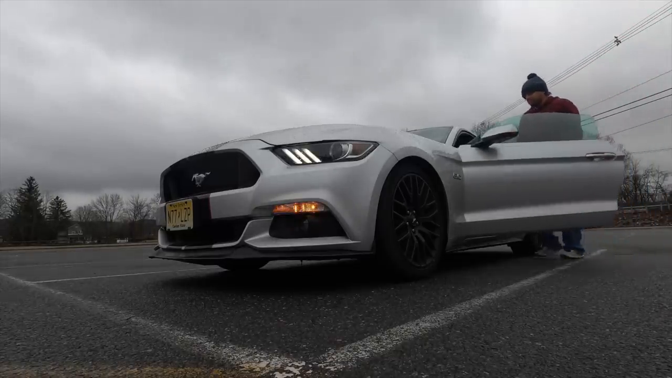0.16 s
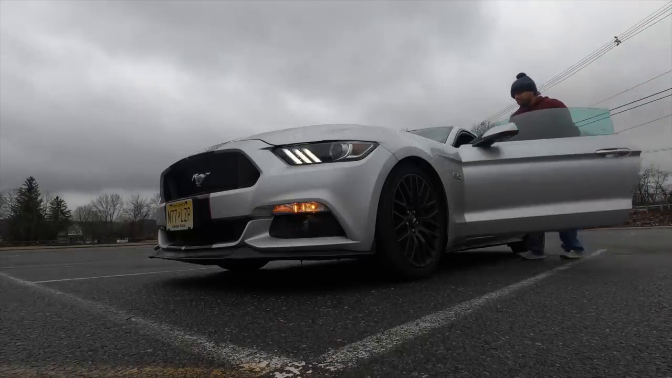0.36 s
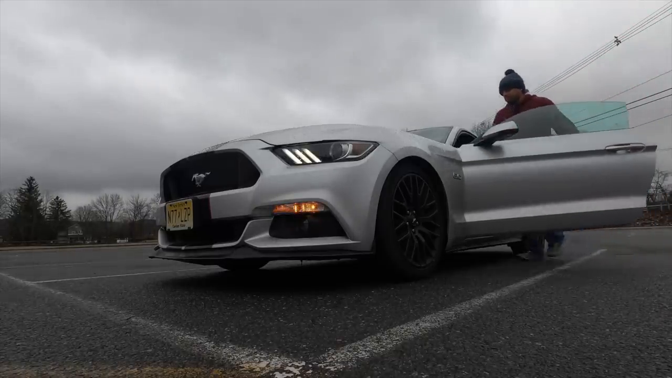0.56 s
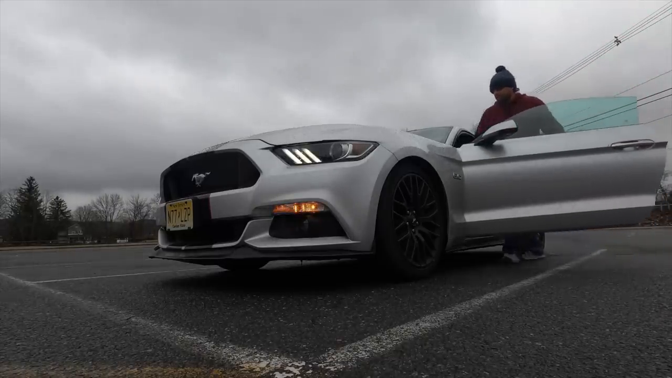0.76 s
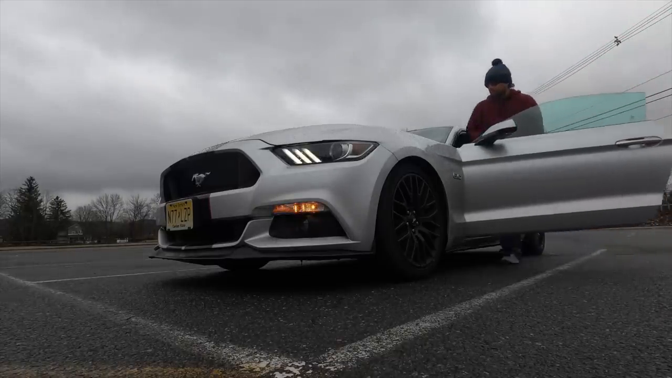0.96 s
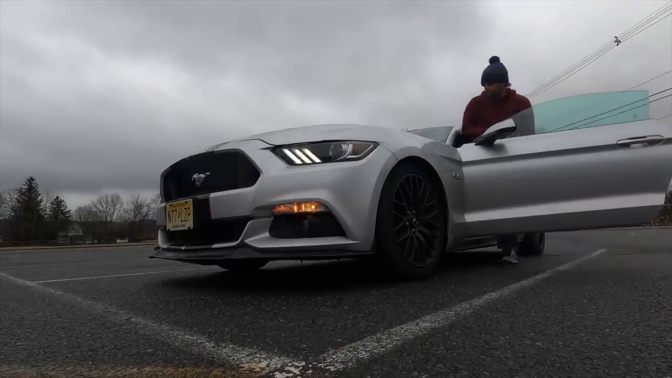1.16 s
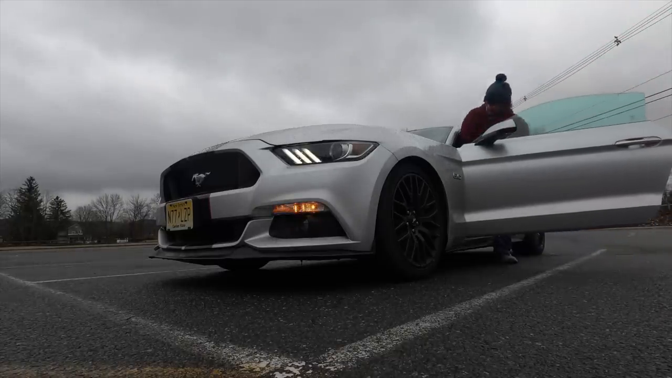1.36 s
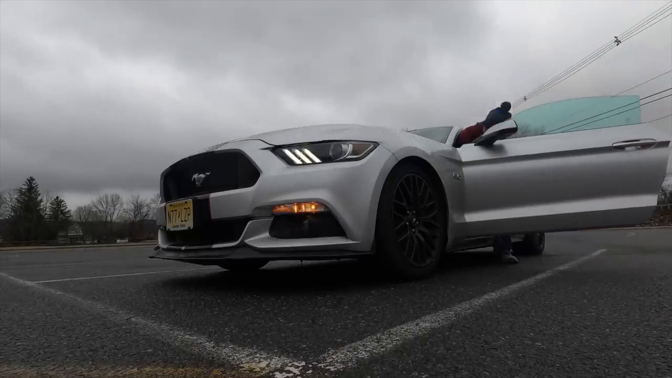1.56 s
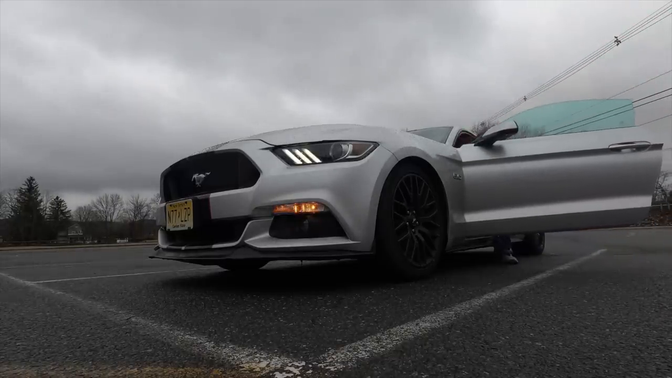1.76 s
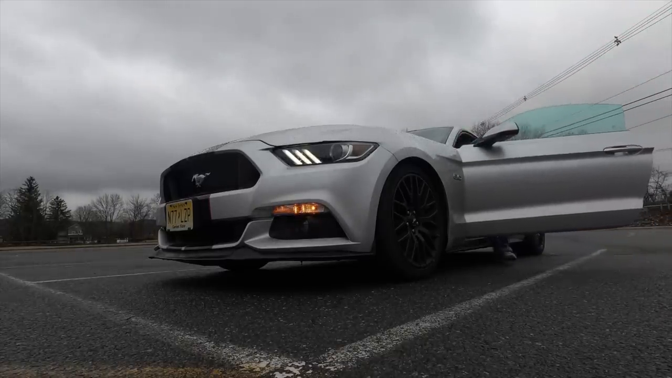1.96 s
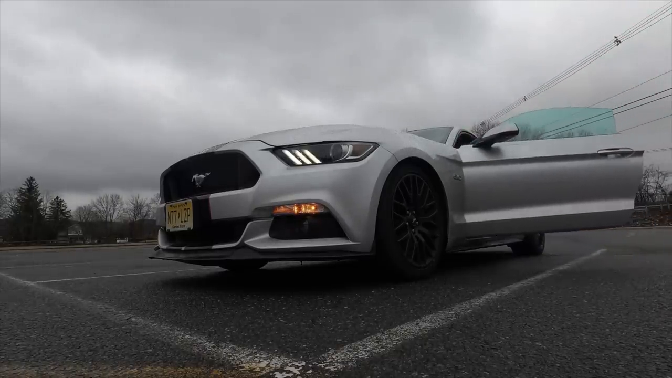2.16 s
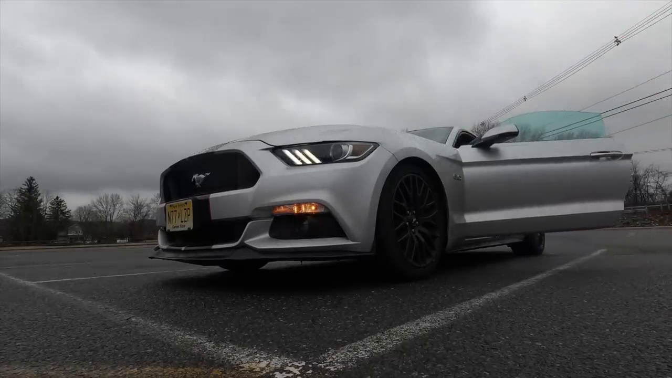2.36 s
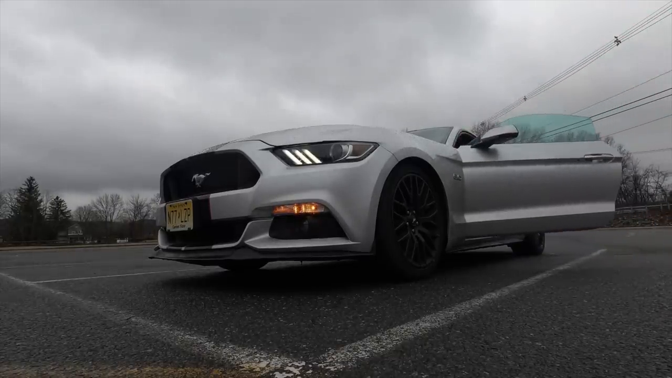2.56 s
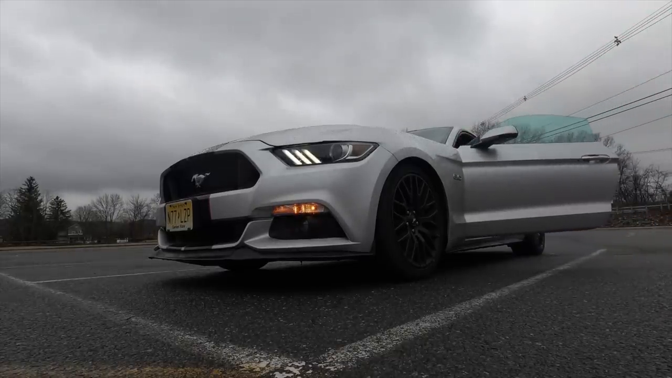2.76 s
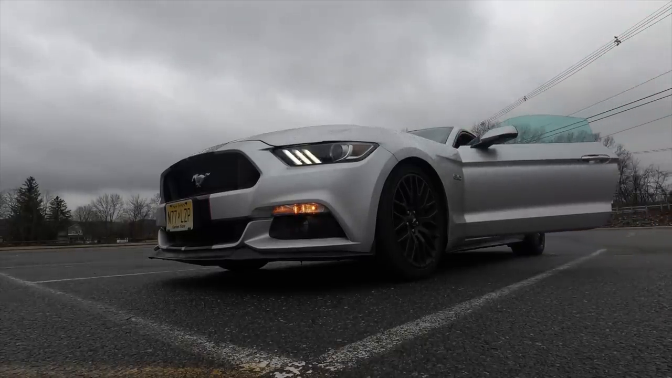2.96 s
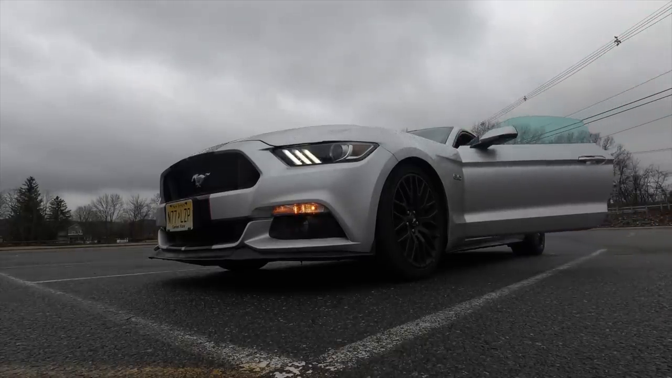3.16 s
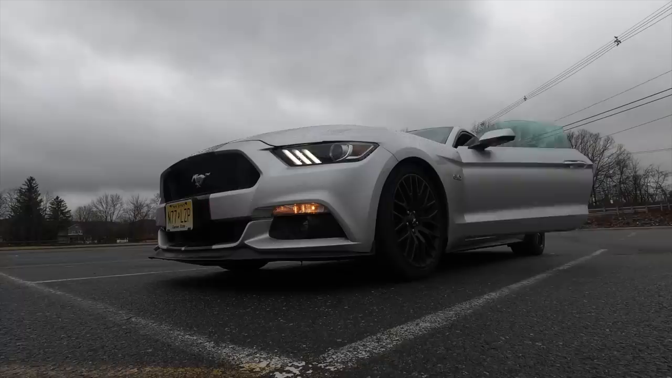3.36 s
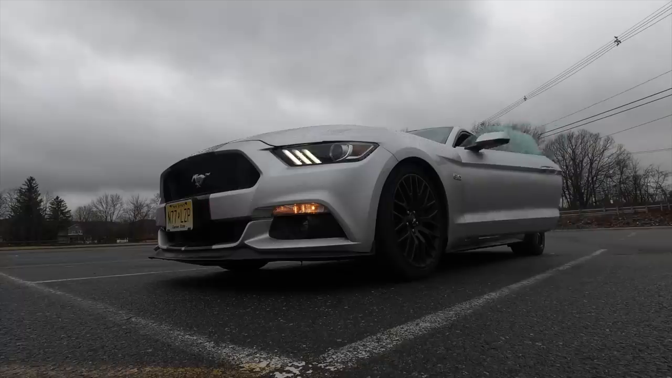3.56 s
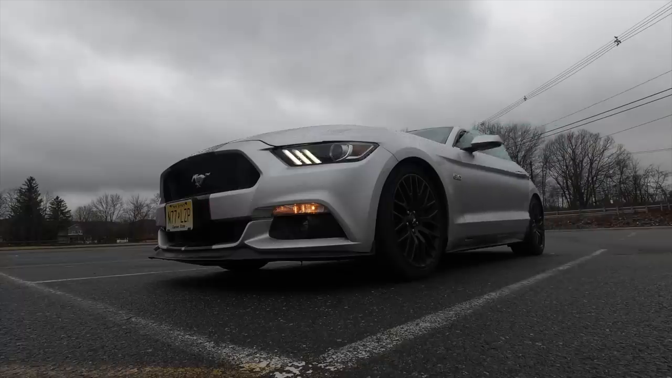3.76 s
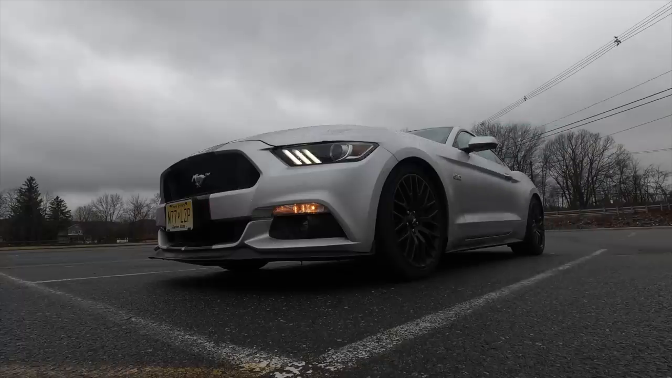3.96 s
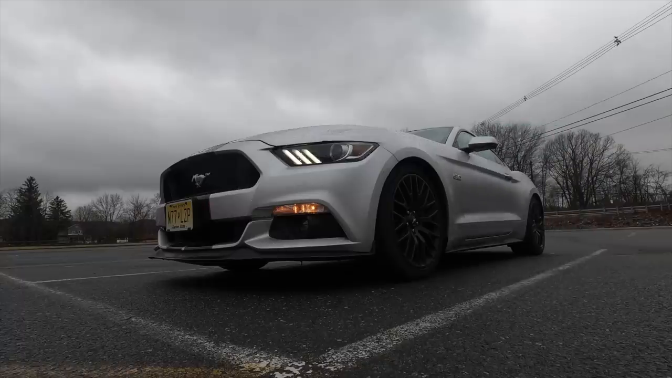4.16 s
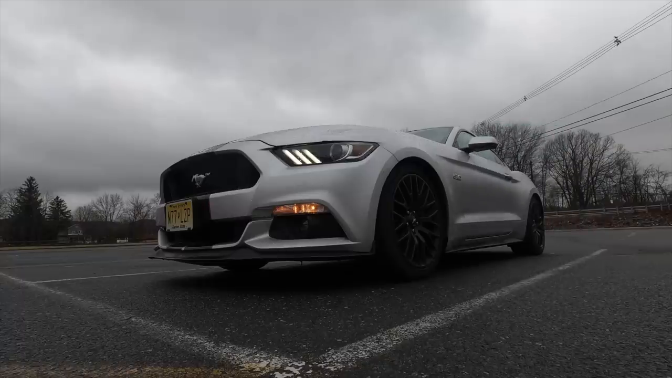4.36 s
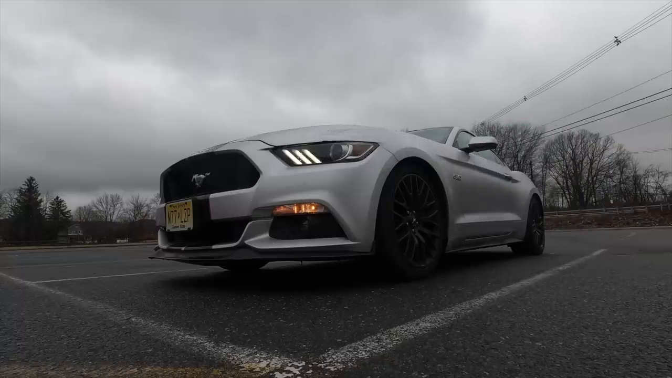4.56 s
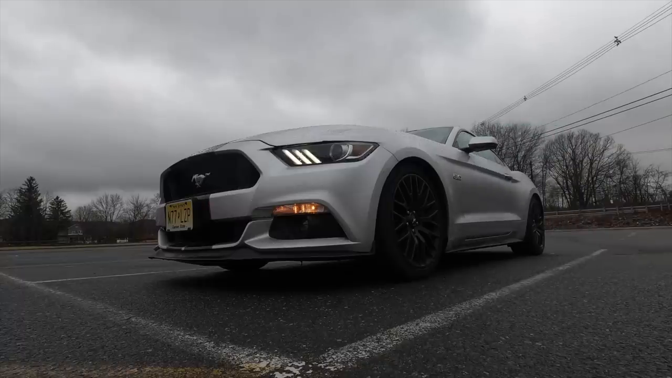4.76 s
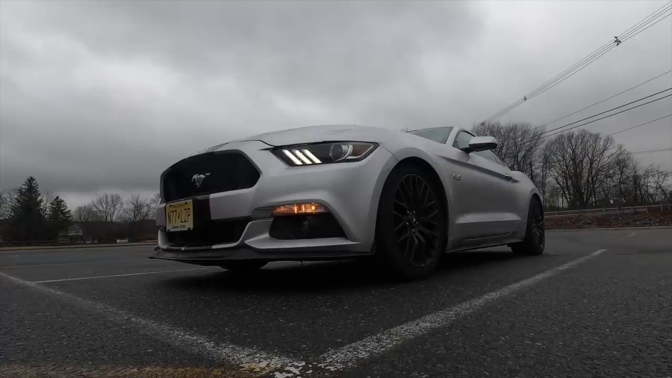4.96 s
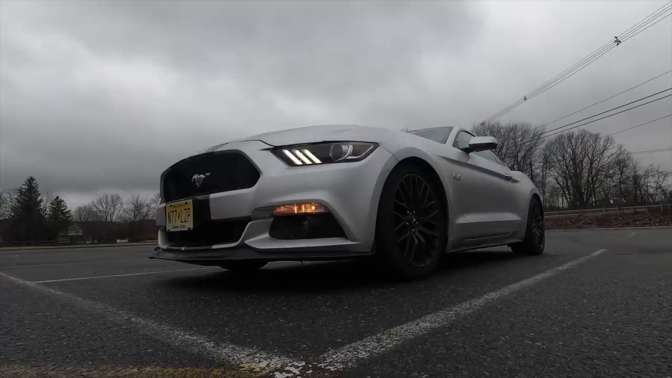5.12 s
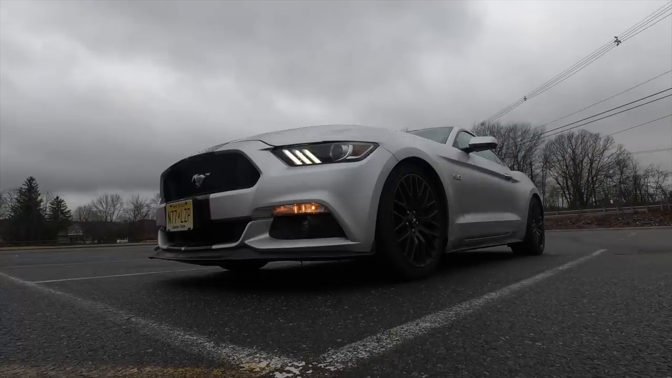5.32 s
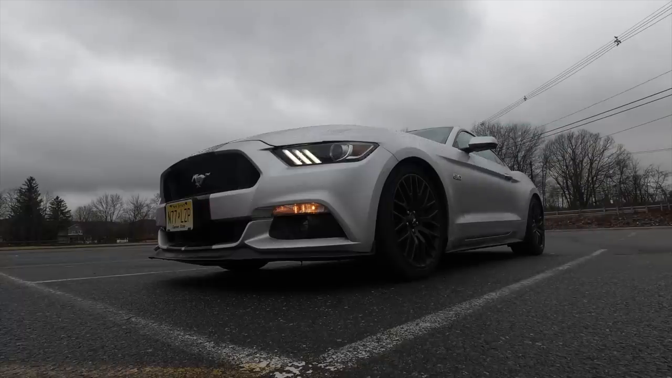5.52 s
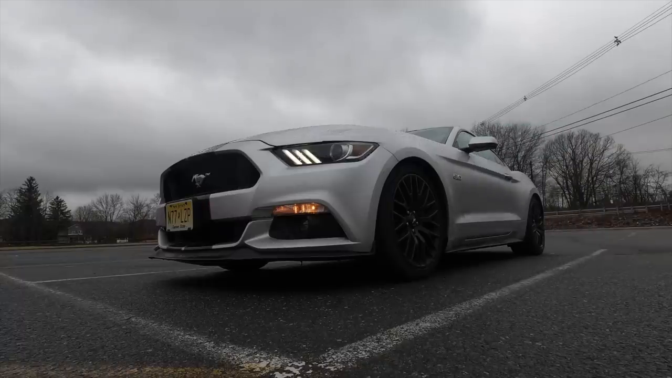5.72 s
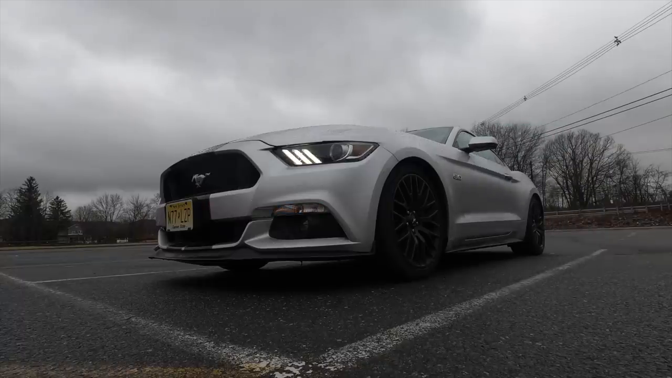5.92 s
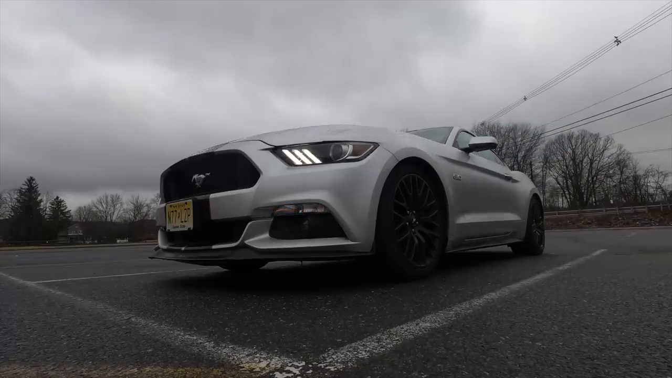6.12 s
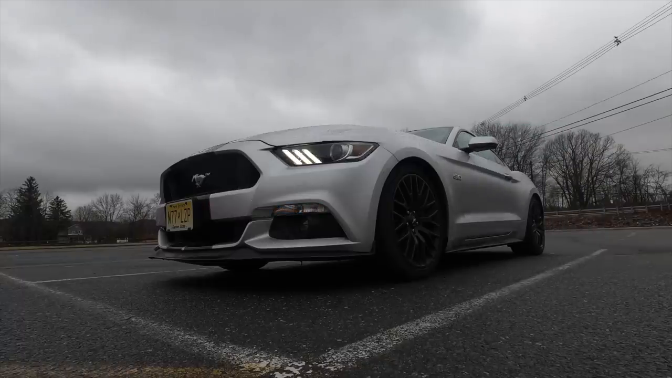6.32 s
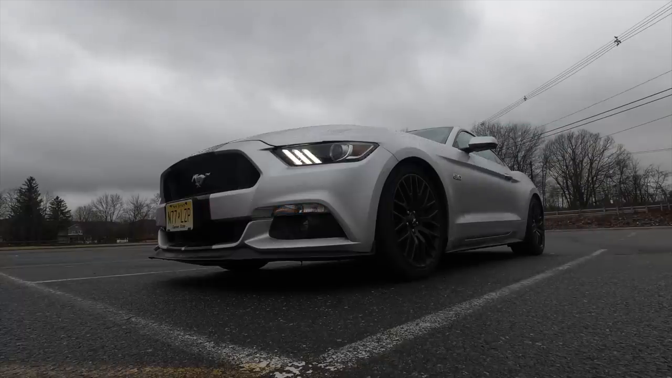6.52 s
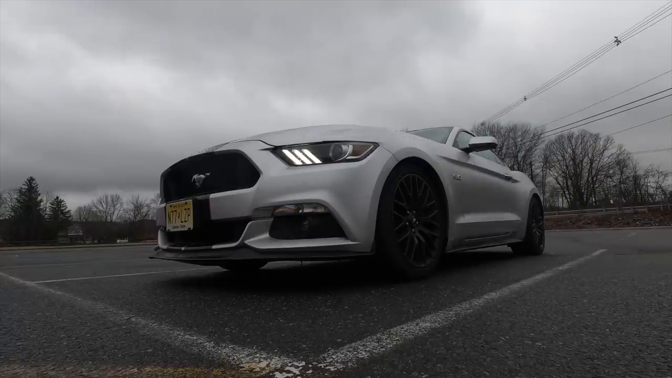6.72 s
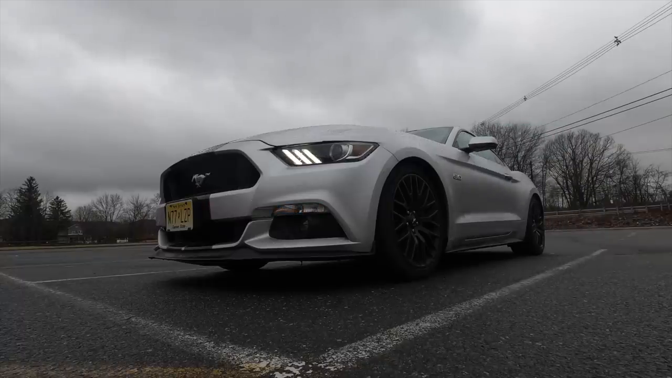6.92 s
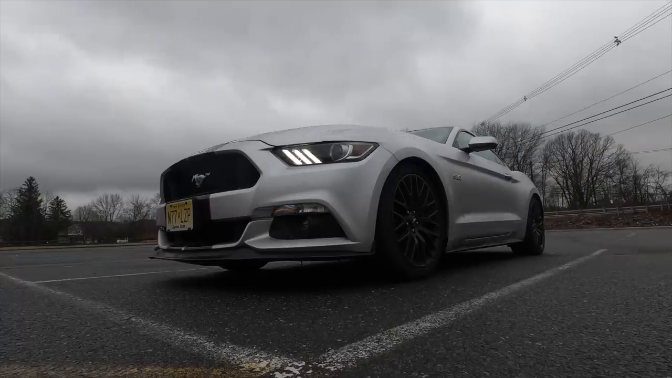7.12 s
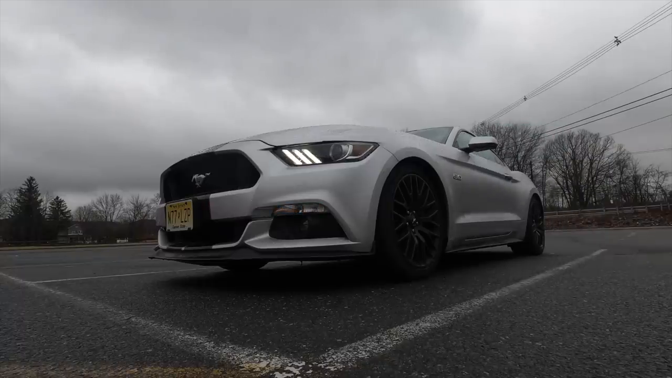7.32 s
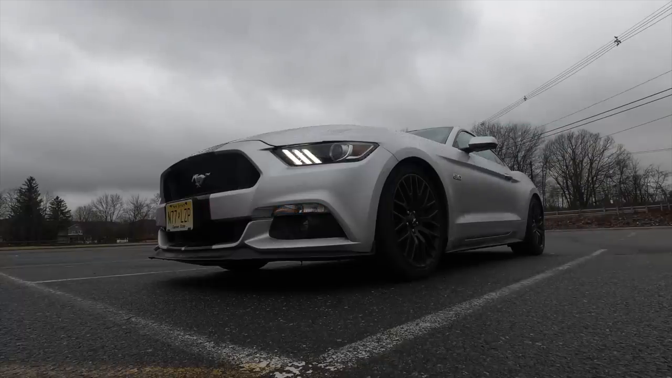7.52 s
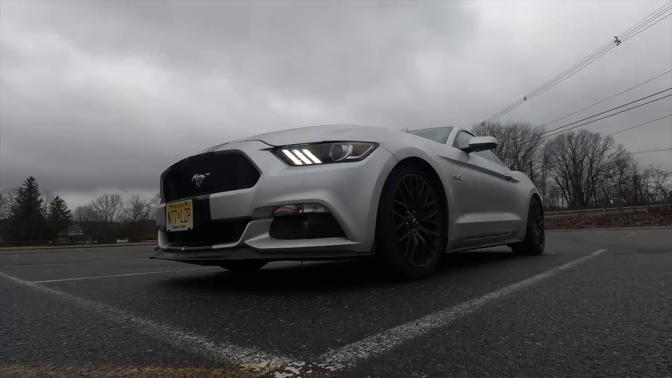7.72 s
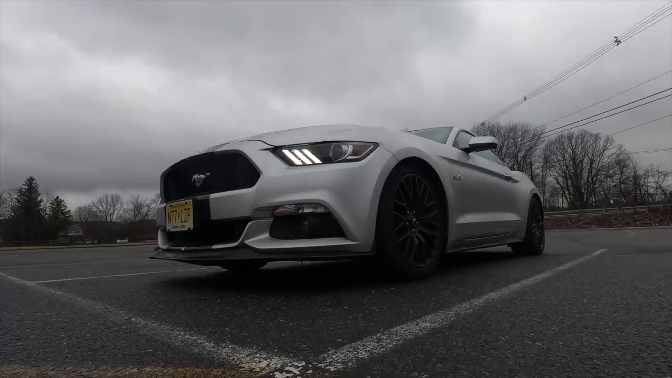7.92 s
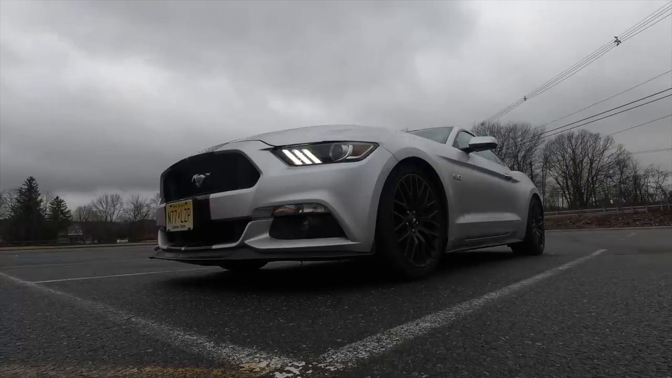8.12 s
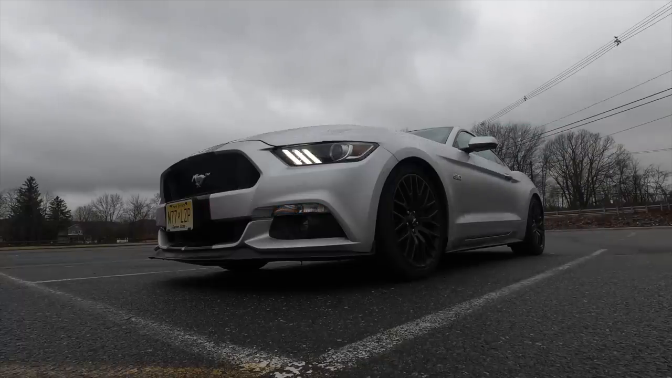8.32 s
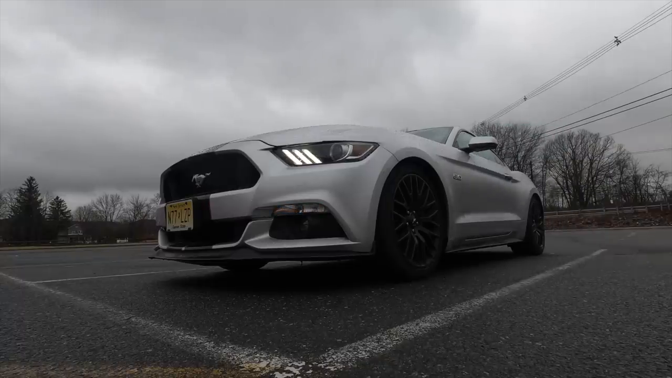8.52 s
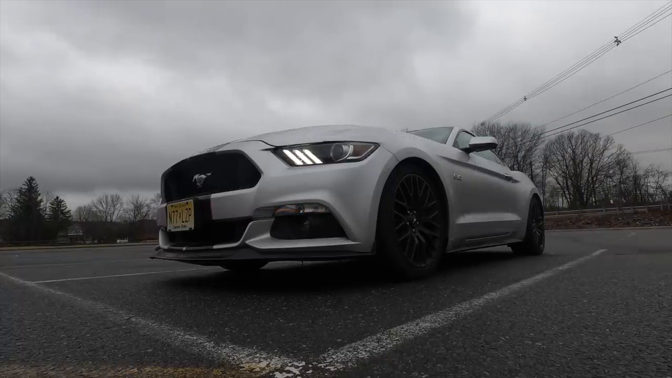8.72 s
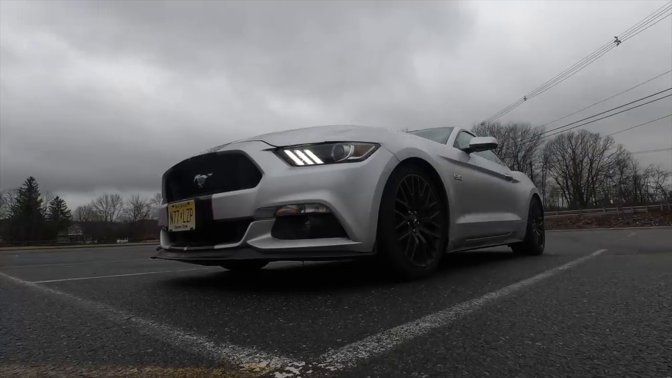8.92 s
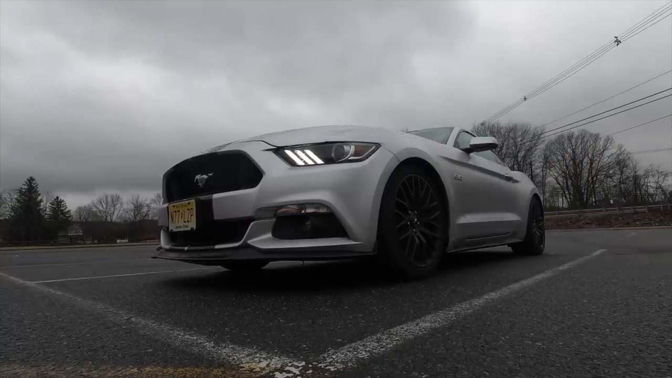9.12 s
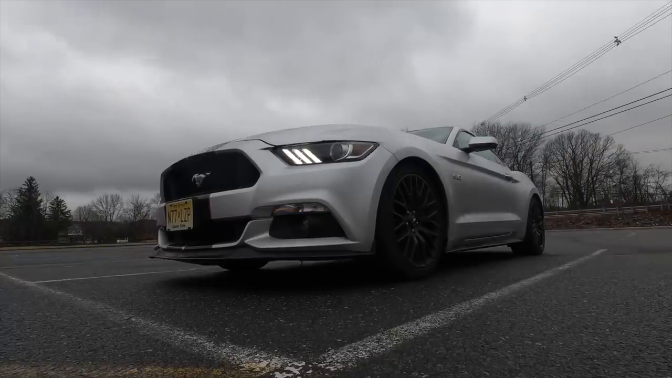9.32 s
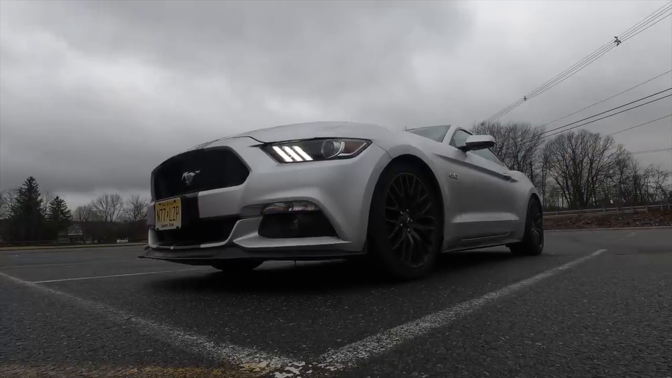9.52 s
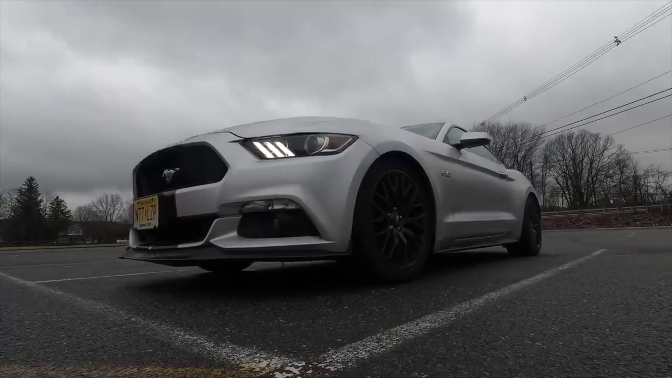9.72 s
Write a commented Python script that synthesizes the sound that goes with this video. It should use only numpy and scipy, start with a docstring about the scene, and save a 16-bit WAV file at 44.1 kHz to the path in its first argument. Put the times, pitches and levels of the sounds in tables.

```python
"""A door slams, a starter whines, and a V8 coupe catches, flares and settles to a fast, booming idle.
It is heard low by the front wheel in an open parking lot, over far traffic. The driver scuffs in; the
slam cracks the latch and rings the panels. The solenoid clacks, gear teeth whine and rattle through five
compression strokes, then firings pulse the exhaust and the idle swells twice. The recorder's gain
control ducks the background after the slam and holds the engine level."""
import sys
import numpy as np
from scipy import signal
from scipy.fft import rfft, irfft
from scipy.io import wavfile
from scipy.ndimage import uniform_filter1d

SR = 44100
rng = np.random.default_rng(int(sys.argv[2]) if len(sys.argv) > 2 else 0)


def transcribe(u):
    """Save the signal u as a 16-bit wav file named by the first command-line argument.

    u: samples, shape (n,) or (channels, n), limited to [-1, 1]; the rate is SR.
    q: integer samples, one column per channel.
    """
    v = np.clip(np.atleast_2d(u).T, -1, 1)
    q = np.round(v * 32767).astype(np.int16)
    wavfile.write(sys.argv[1], SR, q)


N = 435708
T = np.arange(N) / SR
HZ = np.fft.rfftfreq(N, 1 / SR)

# Hiss of throttle air and starter brushes. Each row: frequency in Hz, relative level in dB.
HISS_COLOUR = [(1500, -10), (3500, 12.5), (4900, -5.5), (6500, -3), (9000, -11.5), (12500, -22.5),
               (15000, -34)]

CATCH_S, STEADY_S, FIRING_EDGE_S = 6.822, 7.0, 0.0092  # from STEADY_S the firings run together
ENGAGE_S, OVERRUN_S, RELEASE_S = 5.975, 6.77, 6.95  # from OVERRUN_S the engine drives the starter gear
FIRST_TEETH_HZ, LAST_TEETH_HZ = 256.1, 430.2


def engine_state(idle_hz=89.4, pull_span_hz=8.8, flare_hz=26.17, build_s=0.46):
    """Firing rate sets how hard the engine pulls (0 to 1), and that sets each layer's level."""
    # Engine speed. Each row: time in seconds, firing rate in Hz.
    speed = [(7.0, 84), (7.1, 88.6), (7.22, 95.5), (7.5, 97.4), (7.75, 96.4), (8.0, 90), (8.25, 87.9),
             (9.03, 88.7), (9.28, 98.6), (9.42, 95.5), (9.6, 94.3), (9.87, 79)]
    firing_hz = curves(speed)[0] + flare_hz * swell(6.925, 0.03)
    pull = np.clip((firing_hz - idle_hz) / pull_span_hz, 0, 1)
    built = running(CATCH_S, build_s)
    weak_db = 10.5 * (1 - built)  # the exhaust gains as the firings grow regular
    pickup_db = 3.5 * np.sin(np.pi * built)  # extra load while first gaining speed
    boom_db = -6 - 2 * pull - 0.58 * weak_db
    load_db = -25 + 6.5 * pull + pickup_db - weak_db
    clatter_db = -33.5 + 2.5 * pull
    return firing_hz, pull, boom_db, load_db, clatter_db


def engine():
    """Eight cylinders fire in turn: a boom, side lines from the uneven banks, burble and valve ticks."""
    # Exhaust lines. Each row: multiple of the four-stroke cycle (rounded in use), idling level in dB,
    # pulling level in dB, both relative to the load.
    exhaust_orders = [(4, -17.5, -12), (6, -13.5, -10), (7, -26.5, -1.5), (9.05, -7.5, -0.5), (9.9, -3, 3),
                      (10.9, 1.5, -6), (12, -19, -11.5), (13, -17, -9), (14, -9.5, -6), (15, -9.5, -9.5),
                      (16, -3.5, -8), (18, -8.5, -7.5), (19, -13, -28.5), (24, -11, -16.5),
                      (37.54, -17.5, -14.5), (42, -13, -25.5), (56.5, -26, -17.5), (88, -22, -20.5)]
    firing_hz, pull, boom_db, load_db, clatter_db = engine_state()
    firings = np.cumsum(firing_hz) / SR
    boom = amp(boom_db) * running(STEADY_S, FIRING_EDGE_S) * np.sin(2 * np.pi * firings)
    lines = np.zeros(N)
    for order, idle_db, pull_db in exhaust_orders:
        level = amp(load_db + idle_db + pull * (pull_db - idle_db)) * (1 + 0.16 * wander(4.9))
        offset_turns = 0.012 * order * rng.standard_normal()
        # nearly in phase, the low lines thin the boom once a cycle
        lines -= level * np.sin(2 * np.pi * (firings * round(order) / 8 + offset_turns))
    burble = running(CATCH_S, 0.3) * amp(0.57 * load_db - 14) * exhaust_burble(firings, pull)
    clatter = amp(clatter_db) * valve_clatter(firings)
    return running(CATCH_S, 0.012) * (np.sqrt(2) * (boom + lines) + burble + clatter)


def exhaust_burble(firings, pull, jitter_firings=0.003, unevenness=0.11, lag_rad_per_root_hz=0.45):
    """Each firing sends a puff and a gush of gas down the resonant pipe."""
    # Cylinders in firing order; one barks under load. Each row: relative puff strength idling,
    # strength pulling, lateness in firing intervals.
    cylinders = [(1.0, .85, -.2), (.5, .65, .05), (1.1, .85, -.28), (.55, .7, .1), (1.45, 1.9, 0),
                 (.65, .9, -.1), (1.2, .9, .02), (.7, 1.0, -.12)]
    # Pipe response. Each row: frequency in Hz, relative gain in dB.
    pipe = [(120, -13.5), (220, -10), (280, 2), (350, -4), (420, 0), (470, 6), (510, 1), (560, -3.5),
            (680, -9.5), (800, -12), (900, -9.5), (980, -4.5), (1100, -12.5), (1500, -23.5), (3000, -40),
            (6000, -62)]
    count = np.arange(1, int(firings[-1]))
    idling, pulling, late = np.array(cylinders)[count % len(cylinders)].T
    slip, size = rng.standard_normal((1000, 2))[count % 1000].T
    at = np.interp(count + late + jitter_firings * slip, firings, np.arange(N)).astype(int)
    puffs = np.zeros(N)
    puffs[at] = -(idling + pull[at] * (pulling - idling)) * np.exp(unevenness * size)
    # the silencers hold back the lows, softening each puff
    puffs = irfft(rfft(puffs) * np.exp(-1j * lag_rad_per_root_hz * np.sqrt(HZ)), N)
    gush = noise() * (0.27 + np.exp(-(firings % 1) / 0.45))
    return ring(unit(puffs - puffs.mean()) + 0.25 * unit(gush), pipe)


def valve_clatter(firings, tick_firings=0.16):
    """Valves and injectors tick once a firing, over steady noise."""
    # Clatter spectrum. Each row: frequency in Hz, relative level in dB.
    clatter_colour = [(200, -21), (600, 5.5), (1050, 6), (1600, 1), (2200, -0.5), (3200, -1), (3900, 0.5),
                      (4400, -14.5), (4850, -23), (6000, -16), (8500, -23.5), (10000, -28), (12500, -28.5),
                      (15000, -43.5)]
    ticks = 4.9 + np.exp(-(firings % 1) / tick_firings + 0.36 * wander(90))
    return colour(noise() * ticks, clatter_colour)


def first_firings():
    """The first cylinders to catch each ring the exhaust on their own."""
    # Single firings. Each row: start in seconds, length in seconds, pitch in Hz, peak level in dB.
    firings = [(6.826, 0.04, 84, -10), (6.867, 0.041, 84.2, -10.5), (6.903, 0.032, 107, -13),
               (6.937, 0.05, 81.6, -8.5)]
    out = np.zeros(N)
    for start_s, length_s, hz, db in firings:
        t = np.arange(0, length_s + FIRING_EDGE_S, 1 / SR)
        envelope = np.clip(np.minimum(t, t[-1] - t) / FIRING_EDGE_S, 0, 1)
        add(out, start_s, amp(db) * envelope * np.sin(2 * np.pi * hz * t))
    return out


def starter_state(coast_tau_s=0.3, coast_db_per_s=150, stroke_edge_s=0.0071):
    """Past each compression the gears jump ahead and rattle; the next one drags them down, whining."""
    # Compression strokes. Each row: start in seconds, length in seconds, opening tooth rate in Hz,
    # share of that rate lost, opening rattle drive in dB, mid-stroke whine drive in dB.
    strokes = [(6.187, .15, 335, .22, -21, -19.5), (6.344, 0.12, 342, .2, -18.5, -21.5),
               (6.482, .1, 366, .26, -16, -25), (6.598, 0.075, 370, .07, -15.5, -26.5),
               (6.689, .1, 376, .12, -16, -23.5)]
    coast_s = np.maximum(T - RELEASE_S, 0)
    spun = running(ENGAGE_S, RELEASE_S - ENGAGE_S) ** 1.5
    teeth_hz = (FIRST_TEETH_HZ + (LAST_TEETH_HZ - FIRST_TEETH_HZ) * spun) * np.exp(-coast_s / coast_tau_s)
    slack = (T > strokes[0][0]) & (T < OVERRUN_S)  # quieter between strokes
    drop_db = 6 * slack + coast_db_per_s * coast_s
    bite_db = 5.5 * swell(6.1, 0.042)  # the gears grind as they take the load
    rattle_db = -26.5 + bite_db - drop_db
    whine_db = np.where(T < OVERRUN_S, -26, -38) - drop_db
    for start_s, length_s, opening_hz, sag, top_rattle_db, top_whine_db in strokes:
        during = (T >= start_s) & (T < start_s + length_s)
        progress = (T[during] - start_s) / length_s
        teeth_hz[during] = opening_hz * (1 - sag * progress ** 1.4)
        rattle_db[during] = top_rattle_db - 22.5 * progress ** 2
        whine_db[during] = top_whine_db - 16.5 * (2 * progress - 1) ** 2
    return [smooth(curve, stroke_edge_s) for curve in (teeth_hz, rattle_db, whine_db)]


def starter(rise_s=0.097, scrape_teeth=0.27, chatter_teeth=4.3):
    """Gear teeth strike and scrape, the pinion chatters every few teeth, and the brushes hiss."""
    # Gear rattle response. Each row: frequency in Hz, relative gain in dB.
    rattle_colour = [(200, -25), (330, -11), (500, -16), (800, -30), (1100, 11.5), (1700, 7.5), (2500, 1),
                     (3300, 6), (3950, -2.5), (4850, -28), (5900, -12), (8500, -41.5), (12500, -30.5),
                     (15000, -58)]
    teeth_hz, rattle_db, whine_db = starter_state()
    engaged = running(ENGAGE_S, rise_s)
    teeth = np.cumsum(teeth_hz * (1 + 0.03 * wander(200))) / SR
    strikes = np.diff(np.floor(teeth), prepend=0) * (1 + 0.24 * noise())
    mesh = (strikes - teeth_hz / SR) * np.sqrt(SR / LAST_TEETH_HZ)  # zero mean, rms near 1
    contact = 1.1 + np.exp(-(teeth % 1) / scrape_teeth)
    scrape = unit(noise() * contact * np.exp(0.13 * wander(250)))
    scrape_db = rattle_db - 7 - 6 * running(OVERRUN_S, rise_s)
    whine = starter_housing(engaged * (amp(whine_db) * mesh + amp(scrape_db) * scrape))
    chatter = 1 + 0.35 * np.sin(2 * np.pi * teeth / chatter_teeth)
    rattle = amp(rattle_db - 6) * ring(chatter * (scrape + 0.45 * unit(mesh)), rattle_colour)
    brushes = amp(-39.5) * (1 - running(RELEASE_S, rise_s)) * colour(noise(), HISS_COLOUR)
    # the first full stroke pushes a puff out of the exhaust
    puff = amp(-23.5) * swell(6.275, 0.041) * colour(noise(), [(40, -25.5), (80, 30), (140, -51)])
    return whine + engaged * (rattle + brushes + puff)


def starter_housing(drive, low_cut_hz=200, sharpening=0.19):
    """The teeth's overtones sweep the housing's modes, which ring on."""
    # Housing modes. Each row: frequency in Hz, width before sharpening in Hz, relative gain in dB.
    modes = [(322, 190, -4.5), (960.7, 8.7, 9.5), (1064, 21, 2.5), (1153, 16, -4.5), (1268, 18, -2),
             (1360, 20, 3.5), (1545, 9.6, 0.5), (1740, 69, -3), (1827, 33.5, -4.5), (2200, 41, -13),
             (2370, 33, -10), (2760, 110, -11), (3207, 47, 0), (3775, 99, -7), (5800, 45, -21.5),
             (11100, 110, -32)]
    response = sum((-1) ** k * amp(db) / (1 + 2j * (HZ - hz) / width_hz)
                   for k, (hz, width_hz, db) in enumerate(modes))
    low_cut = HZ ** 2 / (HZ ** 2 + low_cut_hz ** 2)
    response *= low_cut * abs(response) ** sharpening
    response /= np.sqrt(np.mean(abs(response) ** 2))
    return irfft(rfft(drive) * response, N)


def intake():
    """Air rushes past the throttle as the engine catches and as its speed is corrected."""
    # Gulps of air. Each row: centre in seconds, half width in seconds, level in dB.
    gulps = [(6.855, 0.092, -34), (6.937, 0.018, -30), (7.03, 0.09, -43), (7.277, .08, -40.5),
             (7.819, .13, -38), (9.278, 0.053, -39)]
    envelope = sum(amp(db) * swell(centre_s, half_width_s) for centre_s, half_width_s, db in gulps)
    return envelope * colour(noise(), HISS_COLOUR)


def door(seal_s=0.00044, crack_rise_s=0.0003, tail=0.37):
    """Each contact cracks the latch; the heavy blows set the panels and cabin air ringing."""
    # Panel and cabin modes. Each row: frequency in Hz, relative level in dB, t60 in seconds.
    modes = [(50.2, 1, 0.26), (57.8, -4, 0.65), (81.3, -7.5, 0.43), (110, -9, 0.14), (144, -10, 0.27),
             (209, -17.5, 0.32), (282, -18, 0.27)]
    # Heavy blows. Each row: start in seconds, level in dB.
    thuds = [(4.016, -5), (4.052, -4.5), (4.101, -7)]
    # The door meets its latch, closes and rattles. Each row: start in seconds, level in dB,
    # tilt in dB per octave, snap time constant in seconds.
    contacts = [(4.004, -15.5, 1.1, .005), (4.016, -12.5, 0.5, 0.0065), (4.022, -18, 1.5, .004),
                (4.0437, -24.5, 2, .005), (4.047, -13.5, -1.2, .014), (4.073, -23, -0.5, .01),
                (4.095, -22.5, -0.5, 0.02)]
    # Crack spectrum. Each row: frequency in Hz, relative level in dB.
    crack_colour = [(60, -9.5), (120, 5), (190, -2.5), (320, -3.5), (480, -8), (700, -1.5), (1200, -8),
                    (2100, -13.5), (2800, -16), (3900, -17), (5000, -37), (7500, -41), (11000, -59),
                    (15000, -88)]
    # Crack decay. Each row: frequency in Hz, t60 in seconds.
    crack_decay = [(100, 0.81), (400, 0.29), (1000, 0.085), (2500, 0.094), (8000, 0.15)]
    out, t = np.zeros(N), T[:SR]
    panels = sum(amp(db - 60 * t / t60_s) * np.sin(2 * np.pi * hz * t) for hz, db, t60_s in modes)
    panels = panels / abs(panels).max() * (1 - np.exp(-t / seal_s))  # the rubber seal softens the blow
    for start_s, db in thuds:
        add(out, start_s, amp(db) * panels)
    onset = 1 - np.exp(-(t / crack_rise_s) ** 2)
    for start_s, db, db_per_octave, snap_s in contacts:
        crack = die_away(colour(noise(SR), tilted(crack_colour, db_per_octave)), crack_decay)
        add(out, start_s, amp(db) * crack * onset * (tail + np.exp(-t / snap_s)))
    return out


def scuffs_and_clicks(grit=0.41):
    """Shoes, handling, relay and solenoid give bursts of gritty noise."""
    # Bursts; the last two are the solenoid's throw and stop. Each row: start in seconds, level in dB,
    # rise in seconds, t60 in seconds, tilt in dB per octave.
    clicks = [(0.42, -50.5, 0.011, 0.14, 3), (0.441, -46, 0.003, 0.06, 7), (0.53, -43.5, 0.0011, 0.08, -3),
              (.706, -38.5, .001, .03, -7), (.96, -46, 0.008, 0.13, -2), (1.11, -55, .03, .3, 2),
              (1.296, -43, .0008, .02, 3), (1.29, -43, 0.018, 0.2, -1), (1.31, -39, 0.008, 0.072, -1.5),
              (1.337, -26.5, 0.0008, 0.025, -1), (1.354, -41, .0008, .02, 3), (1.87, -52, .02, 0.28, 5.5),
              (2.048, -36, .002, 0.045, -2), (2.154, -35, 0.01, 0.12, -13.5),
              (4.729, -30.5, 0.0059, 0.1, -6), (5.001, -40, 0.0019, 0.095, -3),
              (5.544, -37, 0.0045, 0.16, -4), (5.678, -29, 0.0059, 0.11, -3),
              (5.771, -28.5, 0.00084, 0.1, -2), (5.963, -26, .004, 0.12, 1),
              (5.9745, -15.5, 0.004, 0.08, -1)]
    # Burst spectrum. Each row: frequency in Hz, relative level in dB.
    click_colour = [(300, -35.5), (700, -8.5), (1500, -7), (2500, -2.5), (3300, 0), (4000, -4),
                    (4900, -19.5), (7000, -20.5), (10000, -33.5), (15000, -45)]
    out, t = np.zeros(N), T[:16384]
    for start_s, db, rise_s, t60_s, db_per_octave in clicks:
        grains = noise(len(t)) * np.exp(grit * np.repeat(noise(256), 64))
        envelope = np.minimum(t / rise_s, 1) * amp(db - 60 * np.maximum(t - 2 * rise_s, 0) / t60_s)
        add(out, start_s, envelope * colour(grains, tilted(click_colour, db_per_octave)))
    return out


def knocks():
    """Bodywork and metal parts in the door and starter each ring briefly at one pitch."""
    # Knocks and pings. Each row: start in seconds, pitch in Hz, level in dB, t60 in seconds.
    bumps = [(0.468, 3520, -26, 0.016), (.533, 3700, -35, .014), (.902, 8500, -52, .008),
             (.974, 3580, -26.5, 0.016), (2.031, 360, -30.5, 0.1), (2.158, 1010, -32, 0.071),
             (2.719, 152, -26, 0.16), (4.0738, 2600, -12, 0.011), (4.735, 209, -23.5, 0.087),
             (5.031, 183.2, -17, 0.083), (5.998, 1290, -28, .3)]
    out, t = np.zeros(N), T[:16384]
    for start_s, hz, db, t60_s in bumps:
        envelope = np.minimum(t * hz / 2, 1) * amp(db - 60 * t / t60_s)
        add(out, start_s, envelope * tone(hz * t))
    return out


def far_roads():
    """Tyre wash and rumble, swelling slightly as a far car goes by."""
    # Tyre wash spectrum. Each row: frequency in Hz, relative level in dB.
    wash_colour = [(100, -1.5), (200, 0), (400, -5.5), (650, -8.5), (950, -6.5), (1600, -11.5),
                   (2400, -18.5), (3900, -22), (4800, -39.5), (6500, -42), (9000, -58.5), (13000, -82)]
    # Rumble spectrum, same columns.
    rumble_colour = [(15, 0), (30, 1.5), (55, 8.5), (80, 1.5), (120, 0), (200, -13.5), (320, -25),
                     (700, -66), (3000, -110)]
    passing_db = swell(5.64, 0.59)
    wash = amp(-37.5 + passing_db + 0.5 * wander(11)) * colour(noise(), wash_colour)
    rumble = amp(-33 + passing_db + 0.5 * wander(6.7)) * colour(noise(), rumble_colour)
    return wash + rumble


def far_vehicles():
    """One vehicle drones on its third and fourth engine orders and slows; another hums briefly."""
    # Third order of the drone. Each row: time in seconds, pitch in Hz, relative level in dB.
    drone_path = [(0.0, 142.4, -38), (0.43, 135.7, -32), (1.42, 139.7, -33), (1.77, 121, -40),
                  (2.03, 157.8, -46), (2.14, 150.3, -34.5), (2.19, 133, -33), (2.24, 110.7, -31.5),
                  (2.34, 113.7, -42.5), (2.5, 122.7, -35.5), (2.63, 109.4, -37.5), (2.68, 73.2, -34.5),
                  (3.0, 66.6, -34.5), (4.01, 60.6, -36), (4.5, 63, -30), (6.7, 59.7, -39)]
    # Rising hum, same columns.
    hum_path = [(1.4, 212, -71), (1.54, 213, -36), (1.75, 224.7, -45), (1.9, 232, -45.5),
                (2.15, 240.5, -51), (2.3, 240, -95.5)]
    drone_hz, drone_db = curves(drone_path)
    turns = np.cumsum(drone_hz * (1 + 0.008 * wander(12))) / SR
    drone = amp(drone_db - 0.5 + 2 * wander(21)) * (tone(turns) + amp(-9.5) * tone(turns * 4 / 3))
    hum_hz, hum_db = curves(hum_path)
    hum = amp(hum_db + 1.5 * wander(14)) * tone(np.cumsum(hum_hz) / SR)
    return drone + hum


def electrical_whine(hz=5179, left_db=-65.5, right_db=-77, octave_db=-35):
    """A faint, steady electrical tone and its octave, in stereo."""
    return amp([[left_db], [right_db]]) * (tone(hz * T) + amp(octave_db) * tone(2 * hz * T))


def ports(x):
    """Two close microphone ports hear each band at a different level and phase."""
    # Port balance. Each row: frequency in Hz, left minus right in dB.
    balance = [(100, 0.55), (500, -0.5), (1100, -1.3), (1600, -0.3), (2300, 2), (3200, 4.5), (4200, 7),
               (5000, 9), (6000, -14.5), (8000, -22.5), (13000, -18)]
    # Port phase. Each row: frequency in Hz, lead of the left in radians.
    lead = [(20, 0.27), (200, 0.06), (1000, 0.63), (2300, -1.07), (3200, -0.95), (4000, -2), (5000, -3),
            (6000, -2), (8000, -1.5)]
    ratio = amp(read(balance, HZ)) * np.exp(1j * read(lead, HZ))
    response = 2 * np.array([ratio, np.ones(len(HZ))]) / (1 + ratio)
    return irfft(rfft(x) * response, N)


def reflections(x):
    """Asphalt and bodywork scatter a short tail, different at each port."""
    # Reflected spectrum. Each row: frequency in Hz, level against the direct sound in dB.
    reflected = [(100, -34), (500, -21), (2000, -16), (3800, -9), (5000, -4), (13000, -5)]
    tail = die_away(rng.standard_normal((2, 16384)), [(200, 0.4), (2000, 0.3), (9000, 0.14)])
    wet = signal.oaconvolve(x[None], tail / np.linalg.norm(tail[0]), axes=1)[:, :N]
    return irfft(rfft(wet) * amp(read(reflected, HZ)), N)


def amp(db):
    return 10 ** (np.asarray(db) / 20)


def unit(x):
    """Scales to rms 1."""
    return x / np.sqrt(np.mean(x ** 2) + 1e-20)


def tone(turns):
    """A sine of rms 1."""
    return np.sqrt(2) * np.sin(2 * np.pi * turns)


def noise(count=N):
    return rng.standard_normal(count)


def wander(hz):
    """Random drift of rms 1, up to about hz."""
    knots = np.arange(0, N, 64)
    knot_hz = np.fft.rfftfreq(len(knots), 64 / SR)
    drift = irfft(rfft(noise(len(knots))) / (1 + (knot_hz / hz) ** 2), len(knots))
    return np.interp(np.arange(N), knots, unit(drift))


def running(start_s, rise_s):
    """A ramp from 0 to 1."""
    return np.clip((T - start_s) / rise_s, 0, 1)


def swell(centre_s, half_width_s):
    """A bell curve of height 1."""
    return np.exp(-((T - centre_s) / half_width_s) ** 2)


def smooth(x, seconds):
    """A running mean."""
    return uniform_filter1d(x, size=max(int(seconds * SR), 1))


def curves(rows):
    """Each column after the first (seconds) as a curve in time."""
    times_s, *columns = np.transpose(rows)
    return [np.interp(T, times_s, column) for column in columns]


def read(points, hz):
    """Reads (Hz, value) points on a log-frequency axis."""
    point_hz, values = np.transpose(points)
    return np.interp(np.log(hz + 1), np.log(point_hz + 1), values)


def tilted(points, db_per_octave):
    return [(hz, db + db_per_octave * np.log2(hz)) for hz, db in points]


def colour(x, points):
    """Zero-phase filter through (Hz, dB) points, to rms 1."""
    return unit(irfft(rfft(x) * amp(read(points, np.fft.rfftfreq(len(x), 1 / SR))), len(x)))


def ring(x, points):
    """Minimum-phase filter through (Hz, dB) points, to rms 1: rings only after each pulse."""
    log_gain = np.log(amp(read(points, abs(np.fft.fftfreq(8192, 1 / SR)))))
    response = np.fft.ifft(np.exp(np.conj(signal.hilbert(log_gain)))).real[:4096]
    return unit(signal.oaconvolve(x, response)[:len(x)])


def die_away(x, t60_points):
    """Decays each band by (Hz, t60 in seconds) points."""
    hz, t, bands = signal.stft(x, SR, nperseg=256)
    decay = amp(-60 * t / read(t60_points, hz)[:, None])
    return signal.istft(bands * decay, SR, nperseg=256)[1][..., :x.shape[-1]]


def add(mix, start_s, sound):
    part = mix[round(start_s * SR):][:len(sound)]
    part += sound[:len(part)]


def scene():
    """Car and traffic, direct and reflected, in stereo."""
    car = engine() + first_firings() + starter() + intake() + door() + scuffs_and_clicks() + knocks()
    sound = car + far_roads() + far_vehicles()
    return ports(sound) + reflections(sound) + electrical_whine()


def record(dry, limit_db=-11.5, recover_db_per_s=3.5, sense_s=0.013, fade_s=0.012, cutoff_hz=15500):
    """Gain control ducks at once under the slam and the engine and recovers slowly; then a low-pass."""
    power_db = 10 * np.log10(abs(smooth((dry ** 2).mean(0), sense_s)) + 1e-12)
    recovery_db = recover_db_per_s * T
    held_db = np.maximum.accumulate(power_db + recovery_db) - recovery_db
    over_db = np.maximum(held_db - limit_db, 0)
    fades = np.clip(np.minimum(T, T[-1] - T) / fade_s, 0, 1)
    ducked = dry * amp(-smooth(over_db, sense_s)) * fades
    low_pass = signal.firwin(511, cutoff_hz, window=("kaiser", 9), fs=SR)
    return signal.oaconvolve(ducked, low_pass[None], "same")


dry = scene()
out = record(dry)
transcribe(out)
```